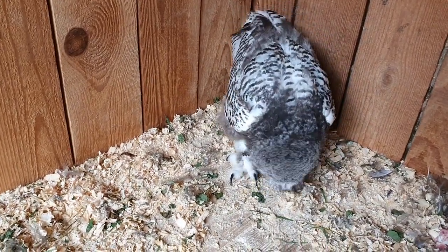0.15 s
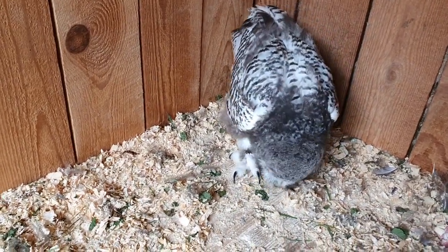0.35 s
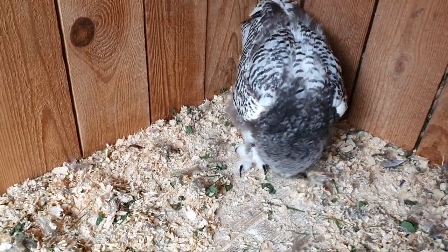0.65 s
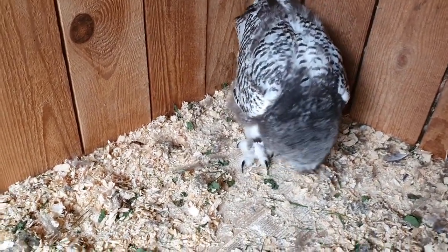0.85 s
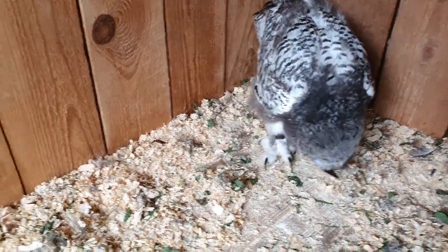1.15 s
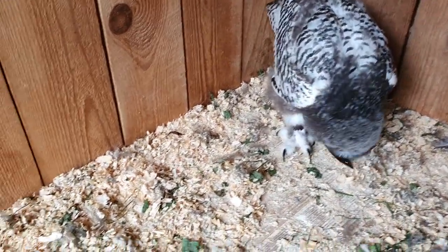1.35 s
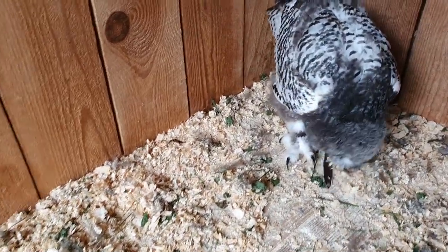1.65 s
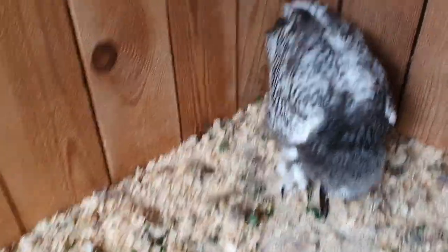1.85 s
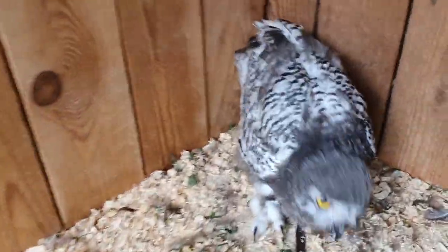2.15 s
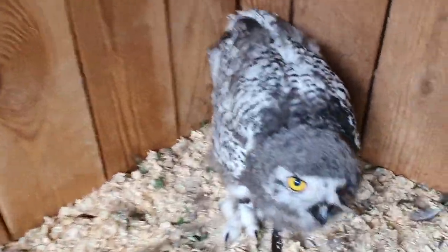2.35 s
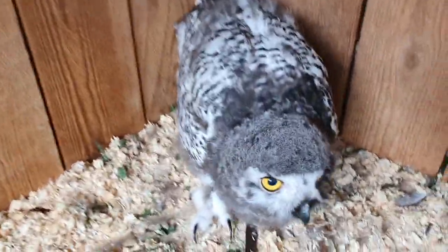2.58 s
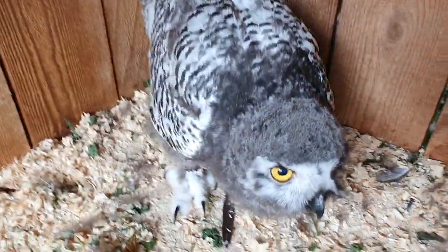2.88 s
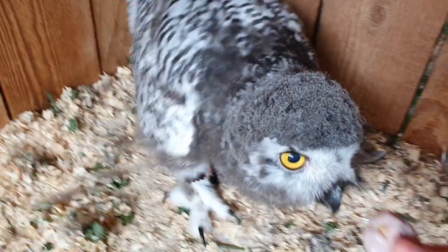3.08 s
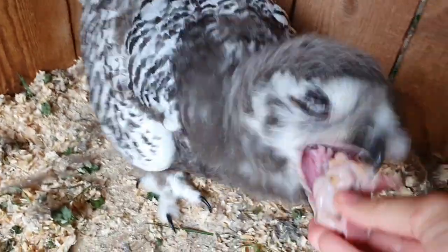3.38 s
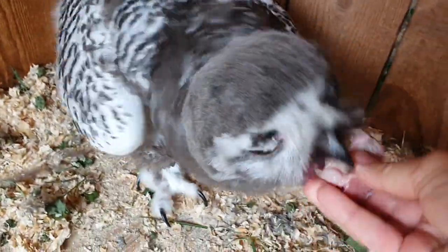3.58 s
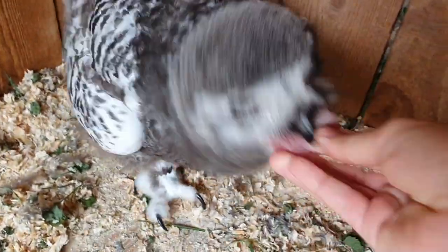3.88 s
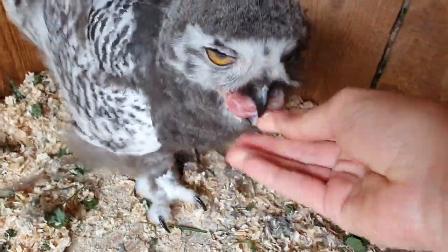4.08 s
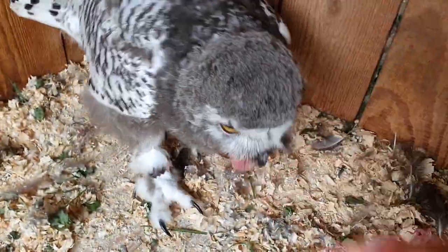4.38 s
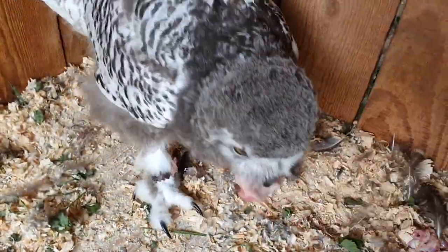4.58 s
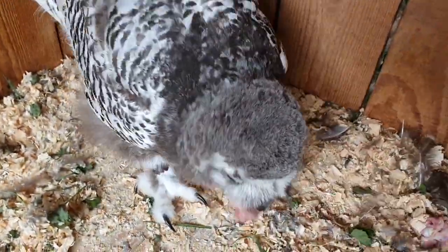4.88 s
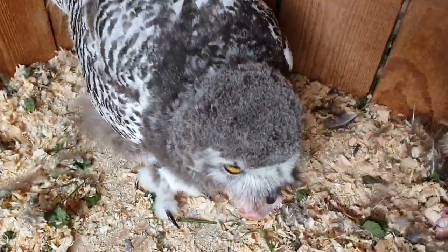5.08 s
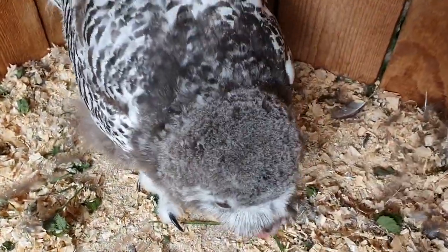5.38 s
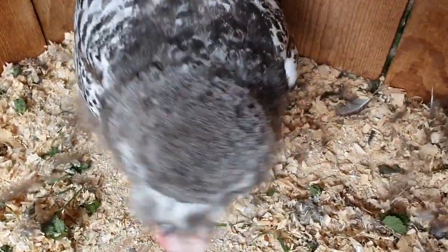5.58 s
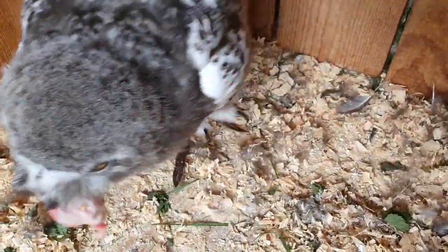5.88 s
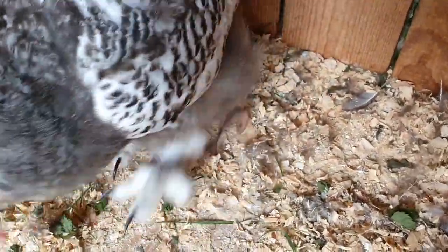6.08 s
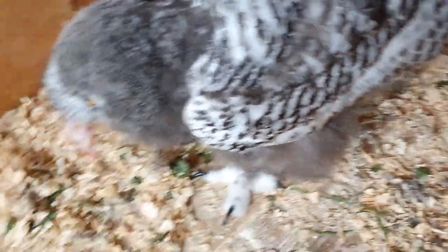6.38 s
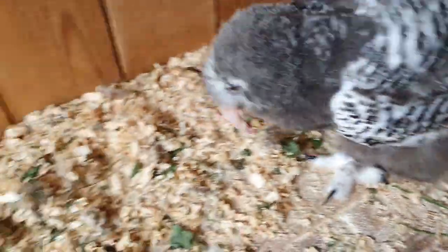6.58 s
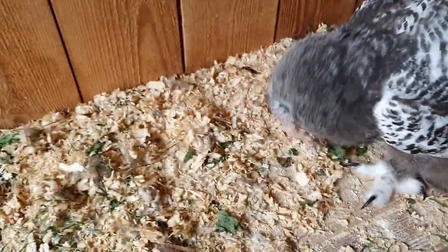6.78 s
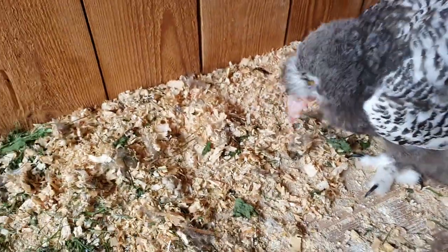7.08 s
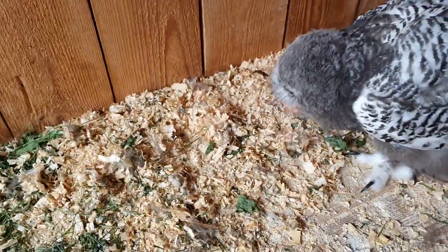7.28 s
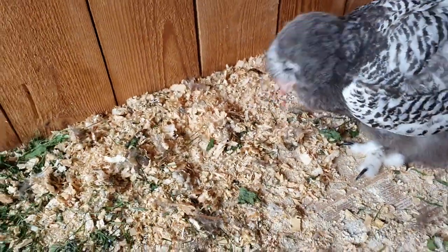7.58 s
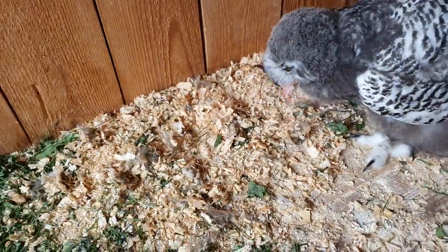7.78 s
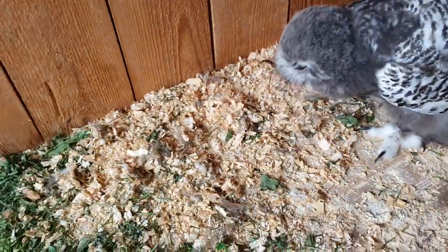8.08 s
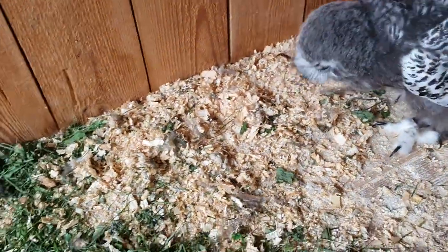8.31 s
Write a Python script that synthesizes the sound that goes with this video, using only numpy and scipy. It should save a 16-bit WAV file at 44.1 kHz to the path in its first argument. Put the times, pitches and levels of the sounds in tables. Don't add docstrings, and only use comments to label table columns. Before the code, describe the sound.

A young owl gives short shrill begging calls in a wooden pen, clacks and chitters over food, then thumps across the hollow floor.

```python
import sys
import numpy as np
from scipy import signal
from scipy.fft import rfft, irfft, next_fast_len
from scipy.io import wavfile
from scipy.ndimage import uniform_filter1d, map_coordinates

SR = 44100
rng = np.random.default_rng(int(sys.argv[2]) if len(sys.argv) > 2 else 0)


def volts_from_db(level):
    exponent = np.asarray(level, float) / 20
    return 10 ** exponent


def put_to_file(sound):
    columns = np.atleast_2d(sound).T
    safe = np.clip(columns, -1, 1)
    whole_steps = np.round(safe * 32767)
    wavfile.write(sys.argv[1], SR, whole_steps.astype(np.int16))


N = 372644


def unit(x):
    return x / np.sqrt(np.mean(x ** 2) + 1e-20)


def along(points, hz):
    f, v = np.transpose(points)
    return np.interp(np.log(hz + 1), np.log(f + 1), v)


def curves(rows):
    s, *cols = np.transpose(rows)
    return [np.interp(np.arange(N) / SR, s, c) for c in cols]


def bursts(tables, fade_s):
    rows = []
    for t in tables:
        rows += [(t[0][0] - fade_s, -110), *t, (t[-1][0] + fade_s, -110)]
    return volts_from_db(curves(rows)[0])


def swells(rows, round_by):
    t = np.arange(0, N + 64, 64) / SR
    power = 0
    for s, rise_s, fall_s, db in rows:
        away = np.where(t < s, (s - t) / rise_s, (t - s) / fall_s)
        power = power + volts_from_db(db - 22 * away ** round_by) ** 2
    return np.interp(np.arange(N) / SR, t, np.sqrt(power))


def wobble(rate_hz):
    knots = rng.standard_normal(int(N * rate_hz / SR) + 4)
    return map_coordinates(knots, [np.arange(N) * rate_hz / SR])


def filtered(x, response):
    m = next_fast_len(x.shape[-1] + 8192)
    return irfft(rfft(x, m) * response(np.fft.rfftfreq(m, 1 / SR)), m)[..., :x.shape[-1]]


def shaped(x, spectrum):
    return filtered(x, lambda hz: volts_from_db(along(spectrum, hz)))


def resonance(centre_hz, width_hz):
    return lambda f: 1j * f * width_hz / (centre_hz ** 2 - f * f + 1j * f * width_hz)


def resonated(x, centre_hz, width_hz):
    return filtered(x, lambda f: resonance(centre_hz, width_hz)(f) ** 2)


def peaked(x):
    return x / np.abs(x).max()


def add(track, s, sound):
    part = track[round(s * SR):][:len(sound)]
    part += sound[:len(part)]


# frequency in Hz, correlation from -1 to 1.
LIKENESS = [(60, 1), (130, 0.89), (290, 0.75), (640, 0.36), (1410, -0.39), (3100, 0.0), (6820, 0.1),
            (15000, -0.1)]


def rush(spectrum):
    def shape(hz):
        turn = np.arccos(np.clip(along(LIKENESS, hz), -1, 1)) / 2
        return volts_from_db(along(spectrum, hz)) * [np.cos(turn), np.sin(turn)]
    mid, side = filtered(rng.standard_normal((2, N)), shape)
    return unit(np.array([mid + side, mid - side]))


# frequency in Hz, t60 in seconds.
WALL_T60 = [(300, .1), (2000, .09), (4500, .11), (5200, .2), (5900, .12), (8000, .09), (14000, .06)]
# frequency in Hz, left lead in radians.
PORT_LEAD = [(0, 0), (1550, 1.4), (3400, 2.1), (3480, -2.2), (5340, -1.9), (8440, -1.2), (9300, 0),
             (13100, 1), (16000, -.8)]


def pen(x, wet_db, pan_db, lag_samples=0, lead=((1, 0),)):
    sign = np.array([[1], [-1]])

    def ports(hz):
        phase = along(lead, hz) / 2 - np.pi * hz * lag_samples / SR
        return volts_from_db(sign * pan_db / 2) * np.exp(1j * phase * sign)
    direct = filtered(x, ports)
    hz, t, z = signal.stft(rng.standard_normal((2, SR // 4)), SR, nperseg=128)
    mid, side = signal.istft(z * volts_from_db(-60 * t / along(WALL_T60, hz)[:, None]), SR, nperseg=128)[1]
    side = filtered(side, lambda f: 1j * f / (500 + 1j * f))
    tail = np.array([mid + side, mid - side]) / np.linalg.norm(mid + side)
    late = np.pad(x, (180, 0))[None]
    return direct + volts_from_db(wet_db) * signal.fftconvolve(late, tail, axes=1)[:, :N]


# time in seconds, level in dB.
RUMBLE = [(0.0, -53), (0.87, -51.5), (1.39, -55.5), (1.55, -53), (2.57, -44), (2.89, -48), (3.58, -49.5),
          (3.97, -46.5), (4.19, -53), (5.04, -47), (5.46, -52.5), (6.47, -47), (7.13, -53.5), (7.51, -49),
          (8.0, -53), (8.45, -49.5)]
# peak in seconds, rise in seconds, fall in seconds, level in dB.
PASSING = [
    (2.55, 1.26, 0.34, -47.5),
]
# frequency in Hz, density in dB per Hz.
DEEP_SPECTRUM = [(20, -28), (30, 16.5), (45, 22.5), (58, 10), (70, -53)]
# frequency in Hz, density in dB per Hz.
HUM_SPECTRUM = [(45, -14), (58, 14.5), (72, 7), (100, 2.5), (140, -10.5), (200, -52.5)]


def rumble():
    strength_db, = curves(RUMBLE)
    swing_db = strength_db - strength_db.mean()
    deep = np.hypot(volts_from_db(-57.5 + 0.55 * swing_db), swells(PASSING, round_by=3.4))
    hum = volts_from_db(-48 + swing_db + 0.6 * wobble(16))
    return deep * volts_from_db(1.4 * wobble(2.8)) * rush(DEEP_SPECTRUM) + hum * rush(HUM_SPECTRUM)


# peak in seconds, rise in seconds, fall in seconds, shavings in dB,
# feathers over them in dB.
STIRS = [
    (0, .1, 0.2, -63.5, -26),
    (2.04, 0.48, 0.56, -52.5, -15.5),
    (3.298, 0.19, 0.18, -65.5, 0),
    (3.476, 0.037, 0.038, -43, -33.5),
    (3.849, 0.48, 0.43, -69.5, -8.5),
    (5.058, .3, 0.79, -59, -10.5),
    (6.84, 0.39, 0.49, -63.5, -12.5),
]
# frequency in Hz, density in dB per Hz.
AIR_SPECTRUM = [(90, -31), (150, -8.5), (300, -12), (500, -16), (850, -11), (1200, -14.5), (1700, -24),
                (2300, -35.5), (3200, -39), (6000, -42.5), (15800, -60)]
# frequency in Hz, density in dB per Hz.
SHAVINGS_SPECTRUM = [(900, -12), (1500, 1), (2300, -1), (3500, -5.5), (5000, -10.5), (7000, -34),
                     (8000, -28), (10000, -36.5)]
# frequency in Hz, density in dB per Hz.
FEATHERS_SPECTRUM = [(3000, -12), (5000, -3), (6800, 0), (8200, -11.5), (12000, -13.5), (15800, -18)]


def rustle():
    lag = .45
    feather_rows = [(s + lag * fall_s, rise_s + lag * fall_s, (1 - lag) * fall_s, db + up_db)
                    for s, rise_s, fall_s, db, up_db in STIRS]
    shavings = swells([row[:4] for row in STIRS], round_by=1.6)
    feathers = swells(feather_rows, round_by=2.35)
    air = np.hypot(volts_from_db(-61.5), volts_from_db(-0.5) * shavings)
    out = air * volts_from_db(1.5 * wobble(22)) * rush(AIR_SPECTRUM)
    out += shavings * volts_from_db(0.44 * wobble(37)) * rush(SHAVINGS_SPECTRUM)
    return out + feathers * volts_from_db(1.2 * wobble(67)) * rush(FEATHERS_SPECTRUM)


# start in seconds, length in seconds, centre in Hz, level in dB.
BRUSHES = [(0, 0.02, 2960, -70.5), (0.426, 0.061, 4500, -72), (0.524, 0.04, 4930, -75.5),
           (1.467, 0.012, 5890, -87), (2.994, .02, 3000, -65.5), (3.066, 0.074, 5950, -74.5),
           (3.941, 0.013, 3000, -52.5), (3.936, 0.082, 9070, -78.5), (4.018, .13, 5360, -66),
           (5.718, 0.017, 10660, -78), (6.156, 0.048, 12070, -78), (6.626, 0.039, 5970, -70.5),
           (6.844, 0.006, 5940, -64), (7.174, 0.01, 4300, -64), (7.348, 0.0055, 4650, -60),
           (7.812, 0.037, 11900, -69), (7.846, 0.014, 11000, -64)]


def brushes():
    out = np.zeros(N)
    for s, length_s, hz, db in BRUSHES:
        grains = rng.standard_normal(SR // 6) * volts_from_db(4.2 * rng.standard_normal(SR // 6))
        band = unit(resonated(grains, hz, 3000 + 0.18 * hz))[:round(length_s * SR)]
        add(out, s, volts_from_db(db) * signal.windows.tukey(len(band), .6) * band)
    return out


def clicks(rows, sharp, t60_s, crack_db):
    out, t = np.zeros(N), np.arange(SR // 20) / SR
    for s, db, hz, low_db in rows:
        burst = rng.standard_normal(len(t)) * volts_from_db(-60 * t / t60_s)
        ring = peaked(resonated(burst, hz, hz / sharp))
        knock = peaked(resonated(burst, 600, 600))
        crack = peaked(resonated(burst, 3800, 4000))
        add(out, s, volts_from_db(db) * (ring + volts_from_db(crack_db) * crack + volts_from_db(low_db + 15) * knock))
    return out


# start in seconds, peak in dB, centre in Hz, low knock in dB.
TICKS = [(0.058, -38, 1490, -54), (0.094, -59.5, 950, 1), (0.277, -41, 910, -27), (.279, -48.5, 2750, -33),
         (0.867, -36.5, 1400, -19.5), (2.786, -44.5, 2070, -14), (3.063, -40, 736, -39),
         (3.084, -43.5, 780, -12.5), (3.096, -32.5, 2570, -41), (3.94, -37, 784, -35),
         (4.101, -53, 1140, -6), (8.305, -54, 840, -12), (8.352, -46, 1360, -38.5),
         (8.384, -60.5, 1400, -23)]


def claws():
    return clicks(TICKS, sharp=1.5, t60_s=.018, crack_db=-13)


# start in seconds, peak in dB, centre in Hz, t60 in seconds.
SNAPS = [(.582, -56, 8000, .021), (1.8037, -61, 11050, 0.017), (1.8156, -52, 12600, 0.012),
         (1.869, -59, 13000, .012), (2.513, -65.5, 11000, .012), (3.0913, -79, 11000, 0.027),
         (3.241, -61, 6000, .021), (3.26, -65.5, 12000, .021), (3.2854, -46, 12000, 0.0373),
         (3.306, -40, 11970, .04), (3.357, -46.5, 11980, 0.054), (3.431, -42.5, 12000, .05),
         (3.532, -51, 12130, 0.042), (3.611, -58.5, 11960, .03), (4.288, -59, 10000, .015),
         (5.142, -49.5, 7460, .015), (5.192, -57, 9000, .015), (5.555, -55.5, 7980, 0.013),
         (6.0198, -53.5, 7000, 0.1), (6.085, -56.5, 6940, 0.014), (6.108, -47.5, 9800, 0.027),
         (6.124, -49, 10000, 0.026), (6.146, -46, 3000, 0.019), (6.1523, -74.5, 12900, 0.023),
         (6.1577, -33, 3000, 0.021), (6.225, -50.5, 12500, .01), (6.431, -64, 8000, .015)]


def snaps():
    out, t = np.zeros(N), np.arange(SR // 12) / SR
    for s, db, hz, t60_s in SNAPS:
        burst = rng.standard_normal(len(t)) * volts_from_db(-60 * t / t60_s)
        add(out, s, volts_from_db(db) * peaked(resonated(burst, hz, 1.7 * hz)))
    return out


def whistles(strokes, rough_db, waver, octave_db, beat=0):
    out, flutter, drift = np.zeros(N), wobble(350), wobble(250)
    for stroke in strokes:
        s, hz, db = np.transpose(stroke)
        i = np.arange(round(s[0] * SR), round(s[-1] * SR))
        turn = 2 * np.pi * np.cumsum(np.interp(i / SR, s, hz) * (1 + waver * drift[i])) / SR
        size = volts_from_db(np.interp(i / SR, s, db) + rough_db * flutter[i])
        size = size * signal.windows.tukey(len(i), 80 / len(i))
        beating = 1 + beat * np.sin(2 * np.pi * 315 * i / SR + drift[i])
        tone = np.sin(turn) + volts_from_db(octave_db) * np.sin(2 * turn)
        out[i] += size * beating * tone * np.sqrt(2)
    return out


def glide(s, length_s, start_hz, end_hz, db, edge_db):
    middle = (s + length_s / 2, (start_hz + end_hz) / 2, db)
    return [(s, start_hz, db - edge_db), middle, (s + length_s, end_hz, db - edge_db)]


FALL_HZ_PER_S, LANDING_HZ = 112000, 3580


def landing(beg, gap_hz):
    return beg[1] + (beg[4] - gap_hz - LANDING_HZ) / FALL_HZ_PER_S


# start in seconds, bill shuts in seconds, rise in seconds, start in Hz,
# top in Hz.
BEGS = [
    (.838, .94, .075, 4300, 7900),
    (1.497, 1.599, .055, 5150, 7450),
    (4.512, 4.615, .085, 4800, 8350),
    (4.855, 4.98, .06, 4360, 8550),
    (7.378, 7.492, .04, 5400, 8250),
    (7.817, 7.929, .056, 5200, 8550),
]
# whistle opening in dB, whistle closing in dB, breath opening in dB,
# breath closing in dB.
EFFORT = [(-44, -30.5, -48, -40.5), (-27.5, -24, -42, -34), (-53.5, -31, -60.5, -43),
          (-35, -63, -46, -37.5), (-38.5, -66, -60, -56), (-32.5, -66.5, -54.5, -48)]
# hoarse opening croak in dB, gap of the low closing glide under the call's
# top in Hz, # closing glide in dB.
LOW_NOTES = [(-66, 1500, -52), (-54.5, 2200, -35.5), (-87.5, 900, -47.5), (-45.5, 4300, -40.5),
             (-80, 1600, -47), (-57, 2500, -42)]
# joins after in seconds, first in Hz, last in Hz, level in dB,
# tires by in dB.
HELD = [(.03, 2400, 7500, -62, 5), (0.017, 4600, 6700, -46.5, 11.5), (0.027, 6000, 5900, -52.5, 2),
        (.022, 6150, 6200, -40.5, 35), (0.009, 6200, 7200, -58, 7), (0.02, 5100, 6800, -46, 26)]
# thin held whistle in dB, lift before the bill shuts in Hz, twin of the held note
# as pitch ratio, twin over it in dB.
CREST = [(-70, 50, 1.22, -6), (-70, 50, .78, -3), (-70, 200, 1.1, -4), (-75, 100, 1.1, -10),
         (-69, 600, .86, -12), (-66, 500, 1.2, -1.5)]
# frequency in Hz, gain in dB.
BILL_GAIN = [(4100, -10), (4600, 0), (5300, -5), (6100, -2), (7000, -9), (7500, -26), (9500, -39)]
# start in seconds, length in seconds, start in Hz, end in Hz, level in dB.
ASIDES = [
    (1.58, 0.041, 1820, 1500, -40.5),
    (7.414, 0.052, 8200, 12000, -57),
    (4.89, .035, 9000, 10000, -63),
    (7.96, 0.0069, 2100, 1540, -42.5),
]


def voices():
    clear, hoarse = [glide(*row, edge_db=17.5) for row in ASIDES], []
    for beg, effort, low, note, crest in zip(BEGS, EFFORT, LOW_NOTES, HELD, CREST):
        s, shut, rise_s, start_hz, top_hz = beg
        open_db, shut_db = effort[:2]
        croak_db, gap_hz, close_db = low
        join_s, first_hz, last_hz, held_db, tire_db = note
        thread_db, lift_hz, twin, twin_db = crest

        t = np.arange(s, shut + (top_hz - 4400) / FALL_HZ_PER_S, .001)
        hz = start_hz + (top_hz - start_hz) * np.sin(np.pi / 2 * np.minimum((t - s) / rise_s, 1))
        hz = hz - FALL_HZ_PER_S * np.maximum(t - shut, 0)
        hz = hz + lift_hz * np.exp(-((t - shut) / 0.014) ** 2)
        opening = open_db + along(BILL_GAIN, hz) - 12.5 * np.maximum(1 - (t - s) / 0.016, 0)
        closing = shut_db + along(BILL_GAIN, hz * 1.1)
        db = np.where(t < shut, opening, closing)
        thread = np.maximum(db, thread_db + 4 * (t > shut))
        clear.append(np.transpose([t, hz, np.where(hz > 6400, thread, db)]))

        for ratio, level in [(1, held_db), (twin, held_db + twin_db)]:
            hoarse.append([(s + join_s, ratio * first_hz, level + 2),
                           (s + join_s + 0.00745, ratio * first_hz, level),
                           (shut, ratio * last_hz, level - tire_db)])
        hoarse.append(glide(s - .004, 0.026, 3400, 3650, croak_db, edge_db=7))
        landed = landing(beg, gap_hz)
        clear.append([(shut, top_hz - gap_hz, close_db - 2.5), (landed, LANDING_HZ, close_db),
                      (landed + .009, LANDING_HZ, close_db - 9)])
    return clear, hoarse


def breaths():
    out = []
    for beg, (*_, open_db, shut_db), low in zip(BEGS, EFFORT, LOW_NOTES):
        s, shut = beg[:2]
        end = landing(beg, low[1]) + 0.0027
        out.append([(s + 0.01, open_db - 10), (s + 0.03, open_db), (shut, 0.59 * open_db + 0.5 * shut_db),
                    (end, shut_db), (end + 0.029, shut_db - 10.5)])
    return out


# frequency in Hz, density in dB per Hz.
THROAT_SPECTRUM = [(1000, -19.5), (1650, -9), (2300, -18.5), (3100, -6.5), (3650, -3), (4300, 2.5),
                   (5300, -1.5), (6300, -8.5), (7400, -16.5), (8100, -33.5), (9700, -30.5), (10300, -36)]


def rasp():
    calls = breaths()
    air = shaped(rng.standard_normal(N) * volts_from_db(2 * wobble(300)), THROAT_SPECTRUM)
    hz, t, z = signal.stft(air, SR, nperseg=256)
    streaks = uniform_filter1d(rng.standard_normal(z.shape), size=2, axis=0)
    streaks = uniform_filter1d(streaks, size=4, axis=1)
    gape = 0
    for call in calls:
        s, end = call[0][0], call[-1][0]
        gape = gape + np.sin(np.pi * np.clip((t - s) / (end - s), 0, 1))
    edge_hz = 6200 + 4200 * np.sqrt(np.abs(gape))
    edge = 1 / (1 + (hz[:, None] / edge_hz) ** 24)
    streaky = signal.istft(z * edge * volts_from_db(3.5 * unit(streaks)), SR, nperseg=256)[1][:N]
    fizz = shaped(rng.standard_normal(N) * volts_from_db(3 * wobble(200)), FEATHERS_SPECTRUM)
    flow = bursts(calls, fade_s=0.029)
    fizz_flow = np.minimum(flow, volts_from_db(-61.5))
    return unit(streaky) * flow * volts_from_db(1.5) + unit(fizz) * fizz_flow * volts_from_db(-10)


def begging():
    upper, lower = voices()
    clear = whistles(upper, rough_db=2.5, waver=.006, octave_db=-58, beat=0.36)
    hoarse = whistles(lower, rough_db=5.5, waver=.022, octave_db=-58)
    return clear + hoarse + rasp()


# start in seconds, centre in Hz, width in Hz, t60 in seconds, level in dB.
FAR_CALLS = [
    (2.59, 2940, 336, 0.43, -48.5),
    (2.597, 1594, 170, 0.6, -58),
    (3.101, 2680, 200, 0.31, -51),
    (5.976, 2700, 447, 0.076, -55.5),
    (6.009, 2900, 397, 0.066, -47),
]


def far_bird():
    out, t = np.zeros(N), np.arange(SR // 4) / SR
    for s, hz, width_hz, t60_s, db in FAR_CALLS:
        band = unit(resonated(rng.standard_normal(len(t)), hz, width_hz))
        fade = (1 - np.exp(-t / 0.014)) * np.minimum(1, (t[-1] - t) / .06)
        add(out, s, volts_from_db(db - 60 * t / t60_s) * fade * band)
    return out


# peak in seconds, rise in seconds, fall in seconds, level in dB.
SCUFFS = [
    (3.0, 0.053, 0.033, -50.5),
    (3.1, 0.12, 0.15, -50.5),
    (3.484, .03, 0.11, -51.5),
    (3.954, 0.017, 0.082, -36.5),
    (5.7, 0.035, 0.04, -57),
    (5.93, .03, 0.048, -49.5),
    (6.518, 0.029, 0.19, -63),
    (8.39, 0.008, 0.021, -43.5),
]
# frequency in Hz, density in dB per Hz.
DRAG_SPECTRUM = [(120, -28), (250, 3), (500, 6), (900, -2.5), (2000, -21.5), (4000, -28), (8000, -39.5)]


def scuffs():
    return swells(SCUFFS, round_by=1.2) * volts_from_db(0.5 * wobble(120)) * rush(DRAG_SPECTRUM)


# start in seconds, peak in dB, floor in Hz, plank in dB, boards in dB.
THUMPS = [
    (3.09, -23, 93.7, -22, -30),
    (4.101, -35.5, 87.3, -15.5, -14.5),
    (5.837, -16.5, 97.3, -10, -17.5),
    (6.159, -15.5, 92.5, -35, -20.5),
]
# frequency in Hz, level in dB, t60 in seconds.
BOARD_MODES = [(361, -1, 0.11), (553, 8, 0.05), (750, -3.5, 0.14), (1083, -4.5, 0.12), (1530, -58, .05)]
# frequency in Hz, density in dB per Hz.
SLAP_SPECTRUM = [(500, -6), (1200, -2), (3000, -7.5), (5000, -16.5), (7500, -28), (9000, -30),
                 (15800, -36.5)]


def thumps():
    out, litter, t = np.zeros(N), np.zeros(N), np.arange(SR // 2) / SR

    def loose_tone(hz):
        return np.sin(2 * np.pi * hz * t + hz / 9000 * np.cumsum(rng.standard_normal(len(t))))
    for s, db, floor_hz, plank_db, board_db in THUMPS:
        modes = [(154, -13, 0.22), (240, plank_db, .13)]
        modes += [(hz, level + board_db, t60_s) for hz, level, t60_s in BOARD_MODES]
        ring = sum(volts_from_db(level - 60 * t / t60_s) * loose_tone(hz) for hz, level, t60_s in modes)
        boom = 2.1 * (1 - np.exp(-t / .011)) * volts_from_db(-60 * t / .15) * loose_tone(floor_hz)
        add(out, s, volts_from_db(db) * ((1 - np.exp(-t / 0.003)) * ring + boom))
        slap = unit(shaped(rng.standard_normal(len(t)), SLAP_SPECTRUM))
        add(litter, s, volts_from_db(-44.5 + 0.2 * (db + 6.5) - 60 * t / 0.17) * slap)
    return out, litter


# start in seconds, peak in dB, ring in Hz, low knock in dB, wheeze in dB.
CLACKS = [
    (3.2793, -48, 4360, -23, -56.5),
    (3.351, -28, 3240, -33, -51),
    (3.4293, -24.5, 3300, -21.5, -52.5),
    (3.514, -29, 3200, -24.5, -53),
    (3.5964, -31.5, 2593, -24, -56.5),
    (3.68, -35, 2470, -23, -56),
    (3.7701, -34.5, 2180, -19, -55),
]
# frequency in Hz, density in dB per Hz.
WHEEZE_SPECTRUM = [(1200, -19.5), (2600, -3), (4000, -1), (7300, -6.5), (8300, -25), (11000, -21),
                   (15800, -15)]


def clacks():
    bill = clicks([row[:-1] for row in CLACKS], sharp=4, t60_s=.011, crack_db=-25)
    puffs = [[(s, db), (s + 0.029, db - 3.5), (s + 0.045, db - 8.5)] for s, *_, db in CLACKS]
    air = shaped(rng.standard_normal(N) * volts_from_db(3 * wobble(400)), WHEEZE_SPECTRUM)
    return bill + unit(air) * bursts(puffs, fade_s=.004)


# start in seconds, length in seconds, level in dB.
CHIRPS = [
    (3.301, 0.014, -30.5),
    (3.378, 0.011, -26),
    (3.455, 0.0085, -35),
    (3.534, 0.0059, -36.5),
    (3.623, 0.008, -39.5),
    (3.71, 0.0036, -42),
    (3.794, 0.0032, -49),
    (3.979, 0.0049, -55),
]
# start in seconds, start in Hz, level in dB.
UNDER = [
    (3.304, 3850, -39.5),
    (3.382, 3336, -33.5),
    (3.626, 3000, -48),
    (3.709, 5440, -43.5),
]


def chirps():
    rows = [(s, 4260, 6930, length_s, db) for s, length_s, db in CHIRPS]
    rows += [(s, hz, 1.13 * hz, 0.015, db) for s, hz, db in UNDER]
    strokes = [[(s, a, db - 0.5), (s + length_s / 2, (a + b) / 2, db - 4.5), (s + length_s, b, db - 23.0)]
               for s, a, b, length_s, db in rows]
    return whistles(strokes, rough_db=6.0, waver=0.0081, octave_db=-28.5)


def scene():
    floor, slaps = thumps()
    litter = slaps + claws() + far_bird() + brushes()
    out = rumble() + rustle() + scuffs()
    out += pen(litter, wet_db=-3, pan_db=.6, lead=PORT_LEAD)
    out += pen(snaps(), wet_db=-10, pan_db=.6, lead=PORT_LEAD)
    out += pen(begging(), wet_db=-10, pan_db=.8, lead=PORT_LEAD)
    out += pen(floor, wet_db=-12, pan_db=1.5, lag_samples=-2)
    return out + pen(clacks() + chirps(), wet_db=-9, pan_db=0, lag_samples=-.5)


def roll_off(x):
    return signal.sosfilt(signal.butter(12, 16450, fs=SR, output="sos"), x)


# frequency in Hz, density in dB per Hz.
HISS_SPECTRUM = [(1500, -6.5), (3000, -6), (5500, -9.5), (6800, 7.5), (8000, -12), (11000, -10.5),
                 (15800, -10)]


def record(dry):
    hiss = unit(shaped(rng.standard_normal((2, N)), HISS_SPECTRUM))
    mix = filtered(dry + volts_from_db(-82.0) * hiss, lambda hz: hz < 15830)
    return roll_off(mix)


dry = scene()
out = record(dry)
put_to_file(out)
```